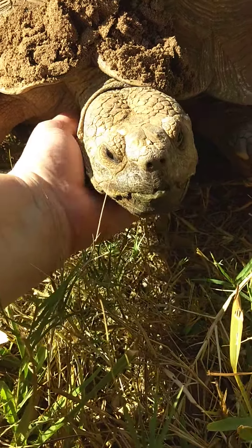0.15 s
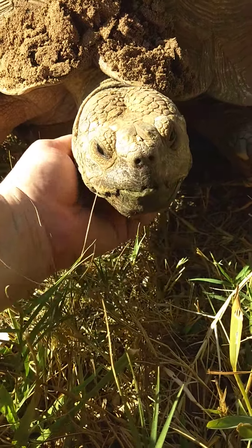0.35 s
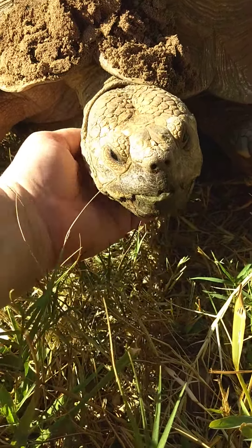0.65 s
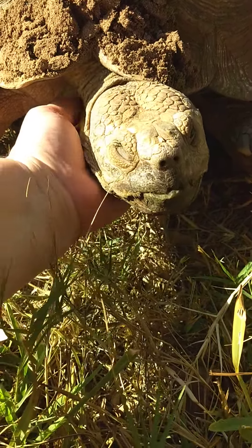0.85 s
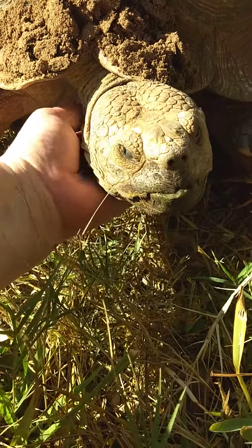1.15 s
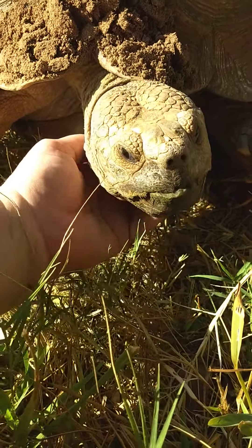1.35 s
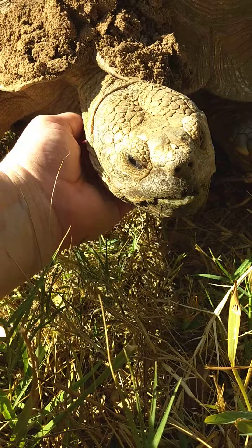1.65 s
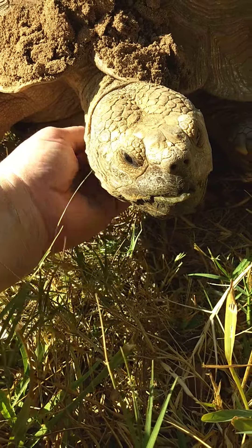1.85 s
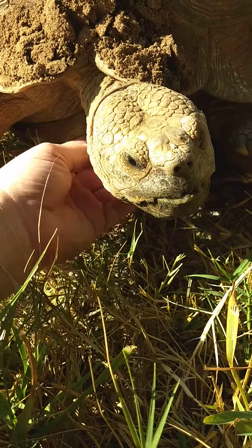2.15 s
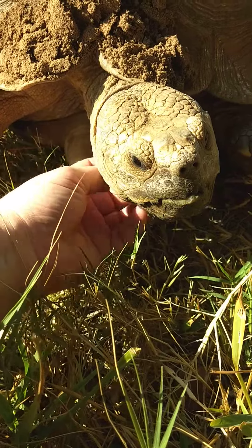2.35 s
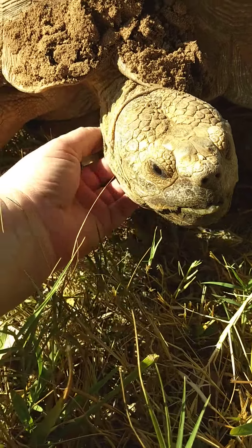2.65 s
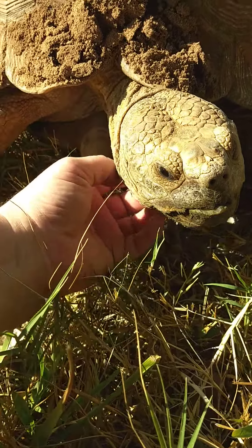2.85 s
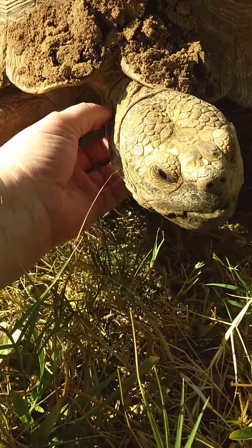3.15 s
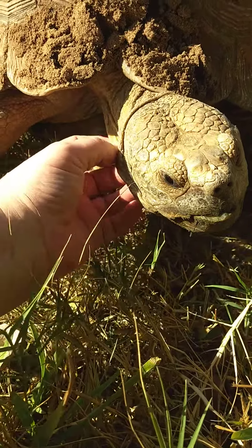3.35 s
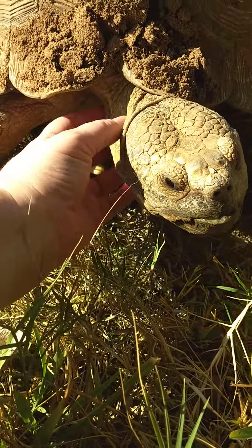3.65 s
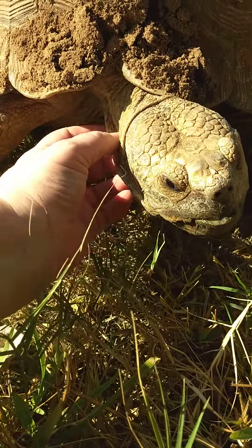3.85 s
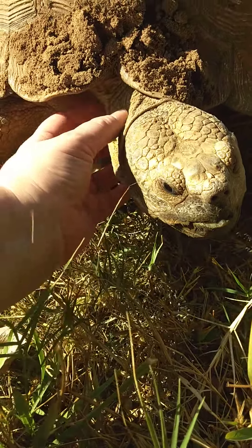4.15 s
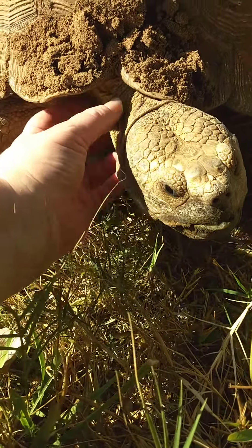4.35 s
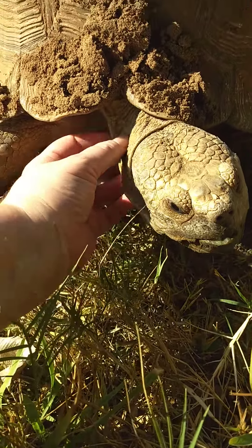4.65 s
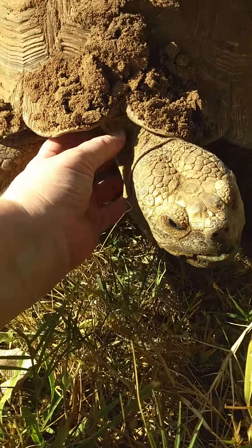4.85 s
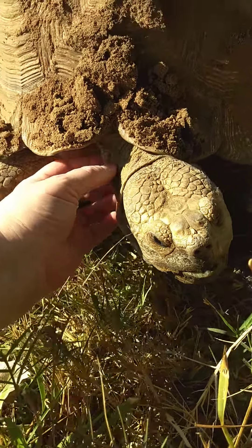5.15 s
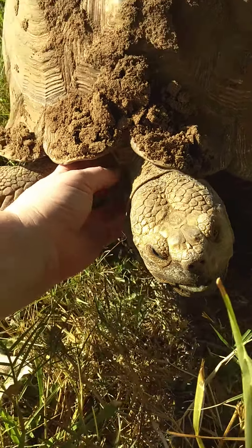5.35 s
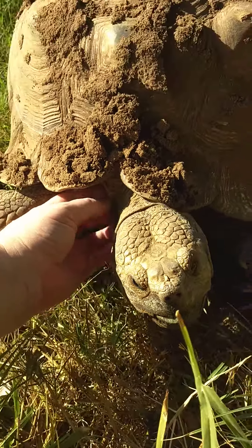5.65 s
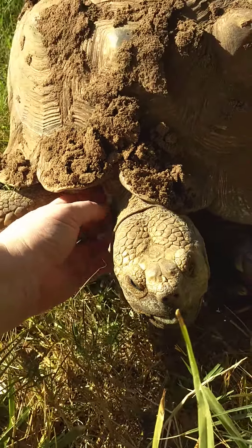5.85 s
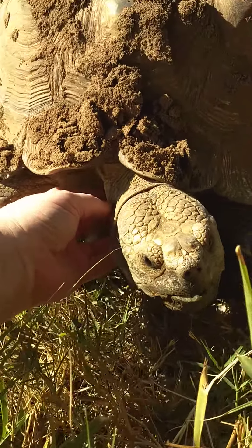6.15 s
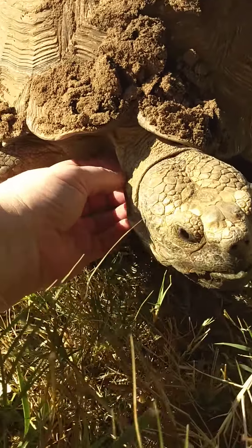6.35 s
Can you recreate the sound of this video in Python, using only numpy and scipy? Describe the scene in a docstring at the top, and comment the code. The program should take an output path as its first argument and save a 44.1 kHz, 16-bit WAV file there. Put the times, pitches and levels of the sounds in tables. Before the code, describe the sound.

Quiet outdoor air with a low distant murmur and steady hiss. A hand strokes a large tortoise's neck, at first barely audible. A bird warbles a quick repeated whistle, then another chatters in dry chips. A short nasal call follows as the rubbing becomes firmer, with crisp grass and grit ticks near the end. The microphone is close to the hand, with the birds farther off in stereo.

```python
"""A hand strokes the neck of a big tortoise on a quiet, sunny lawn, over far murmur and even hiss.
One faint far call opens the scene, then soft strokes begin: skin slipping on dry scales, as filtered
noise grains. A warbler repeats its figure of gliding notes, then a small bird chatters in bursts of
falling chips. A nasal call of harmonics starts as the rubbing firms up, and more far birds call after
it; the loudest flicks of grass and grit come near the end. Two ports subtract to widen the stereo."""
import sys
import numpy as np
from scipy import signal
from scipy.fft import rfft, irfft, next_fast_len
from scipy.io import wavfile

SR = 44100
rng = np.random.default_rng(int(sys.argv[2]) if len(sys.argv) > 2 else 0)


def to_wav(s):
    """Save 16-bit WAV."""
    ch = np.atleast_2d(s).T  # columns
    pcm = np.round(np.clip(ch, -1, 1) * 32767)  # PCM
    wavfile.write(sys.argv[1], SR, pcm.astype(np.int16))


N = 286778
CUTOFF_HZ = 15850
PADDED = next_fast_len(N, True)
TIME = np.arange(N) / SR
FREQ = np.maximum(np.fft.rfftfreq(PADDED, 1 / SR), 1)


def from_db(db):
    """Logarithmic level: 20 dB is a factor of ten in amplitude."""
    return 10 ** (np.asarray(db) / 20)


def rms_one(x):
    """Normalisation: scale to unit mean power."""
    return x / np.sqrt(np.mean(x ** 2) + 1e-20)


def over_freq(points):
    """Interpolation: join (Hz, value) points along a log-frequency axis."""
    hz, value = np.transpose(points)
    return np.interp(np.log(FREQ), np.log(hz), value)


def above(edge_hz, order=4):
    """Butterworth response: amplitude gain of a smooth high-pass."""
    return 1 / np.sqrt(1 + (edge_hz / FREQ) ** (2 * order))


def colour(x, gain):
    """Linear filtering: multiply the spectrum by a gain for each frequency."""
    return irfft(rfft(x, PADDED) * gain, PADDED)[..., :N]


def drift(rate_hz):
    """Random modulation: low-passed noise with spread 1."""
    return rms_one(colour(rng.standard_normal(N), 1 / (1 + (FREQ / rate_hz) ** 2)))


def add(track, s, sound):
    """Superposition: mix a sound into the track from a given second."""
    at = max(int(s * SR), 0)
    track[at:at + len(sound)] += sound[:max(N - at, 0)]


def garden(x, t60, wet_db):
    """Diffuse reflection: one port hears x directly, both hear decaying scatter from plants and walls."""
    t = np.arange(int(t60 * SR)) / SR
    scatter = rng.standard_normal((2, len(t))) * from_db(-60 * t / t60)
    scatter /= np.sqrt(np.sum(scatter ** 2, axis=1, keepdims=True))
    wet = signal.fftconvolve(x[None], scatter, axes=1)[:, :N]
    direct = x * np.array([[0], [1]])
    return direct + from_db(wet_db) * wet


def widen(ports, far_db, cross_db):
    """Delay-and-subtract array: each channel subtracts the other port, late by the travel time."""
    travel_s = 20 / SR
    ports = ports * from_db([[far_db], [0]])
    crossed = colour(ports[::-1], from_db(cross_db) * np.exp(-2j * np.pi * FREQ * travel_s))
    return ports - crossed


# Spectrum of the far murmur before its band limits.
# Each row: frequency in Hz, density in dB per Hz.
MURMUR_SPECTRUM = [(30, -49), (42, -14), (55, -3.5), (90, -4.5), (125, -0.5), (180, -0.44), (300, -3.5),
                   (500, -3.5), (750, -10.5), (1100, -14), (1500, -19)]
# Slow swelling of the murmur, before the common offsets of its two parts.
# Each row: time in seconds, level of the rumble in dB, level of the rush in dB.
MURMUR_SWELL = [(0.0, -51.5, -60), (2.15, -52, -58), (2.3, -54, -62), (2.37, -51.5, -57.5),
                (3.64, -52.5, -59.5), (3.82, -49, -56), (5.5, -51.5, -55.5), (6.48, -50, -56.5),
                (6.5, -52, -56)]
# How alike the murmur is in the two channels.
# Each row: frequency in Hz, left-right correlation from -1 to 1.
MURMUR_CORRELATION = [(40, -0.23), (70, -0.3), (125, 0.38), (250, 0.61), (600, 0.54), (1100, 1),
                      (1550, 0.47)]


def murmur(rumble_db, rush_db, top_hz):
    """Partially coherent field: far traffic and air, a low rumble and a lighter rush that swell apart."""
    mid_noise, side_noise = rng.standard_normal((2, N))
    alike = np.clip(over_freq(MURMUR_CORRELATION), -1, 1)
    low_pass = np.sqrt(1 - above(top_hz, order=6) ** 2)
    gain = from_db(over_freq(MURMUR_SPECTRUM)) * above(40, order=4) * low_pass
    # the shares of sum and difference set the correlation
    mid = colour(mid_noise, gain * np.sqrt(1 + alike))
    side = colour(side_noise, gain * np.sqrt(1 - alike))
    air = np.array([mid + side, mid - side]) * from_db([[-.9], [.9]])
    rush = colour(air, above(626, order=4) ** 2)
    rumble = air - rush
    s, low_db, high_db = np.transpose(MURMUR_SWELL)
    rumble_gain = from_db(np.interp(TIME, s, low_db) + rumble_db)
    rush_gain = from_db(np.interp(TIME, s, high_db) + rush_db)
    return rms_one(rumble) * rumble_gain + rms_one(rush) * rush_gain


# Spectrum of the hiss before its band limits.
# Each row: frequency in Hz, density in dB per Hz.
HISS_SPECTRUM = [(1600, -3), (2500, 2), (4000, -4.5), (6000, -7.5), (8300, -13.5), (11000, -8.5),
                 (15000, -6.5)]


def hiss(level_db, low_hz):
    """Stationary noise: even hiss, independent at the two ports."""
    gain = from_db(over_freq(HISS_SPECTRUM)) * above(low_hz, order=6) * (FREQ < CUTOFF_HZ)
    return from_db(level_db) * rms_one(colour(rng.standard_normal((2, N)), gain))


def glide(length, pitches, waver=0):
    """Frequency modulation: a pure note bends through three pitches and fades at both ends."""
    u = np.linspace(0, 1, int(length * SR))
    bend = np.polyfit([0, .5, 1], pitches, 2)
    hz = np.polyval(bend, u) * (1 + np.resize(waver, len(u)))
    envelope = np.sqrt(2 * np.abs(np.sin(np.pi * u)))
    return envelope * np.sin(2 * np.pi * np.cumsum(hz) / SR)


def whistles(notes, waver_share, waver_rate):
    """Random frequency modulation: gliding notes, the hoarse ones shaking quickly in pitch."""
    out, shake = np.zeros(N), drift(waver_rate)
    for s, length, first, middle, last, db, hoarse in notes:
        waver = waver_share * hoarse * shake[max(int(s * SR), 0):]
        add(out, s, from_db(db) * glide(length, [first, middle, last], waver))
    return out


# Far bird calls, later blurred by distance; levels are before the garden and its final gain.
# Each row: start in seconds, length in seconds, first pitch in Hz, last pitch in Hz, level in dB,
# hoarseness from 0 to 1.
DISTANT_CALLS = [(0, 0.23, 2885, 2740, -69.5, .4), (4.403, 0.51, 2625, 2960, -66.5, 0.84),
                 (4.951, 0.8, 3400, 3738, -60, 0.9), (5.44, 0.083, 2745, 2163, -47.5, 0.9),
                 (5.48, .3, 1780, 1690, -63.5, 0.74), (5.751, 0.26, 2625, 3026, -64.5, .7),
                 (6.256, .2, 2885, 3040, -63, 0.47)]


def far_notes():
    """Linear glide: far calls slide evenly from their first pitch to their last."""
    return [(s, length, first, (first + last) / 2, last, db, hoarse)
            for s, length, first, last, db, hoarse in DISTANT_CALLS]


NASAL_START_S, NASAL_LENGTH_S, NASAL_ATTACK_S, NASAL_RELEASE_S = 3.975, .42, 0.041, 0.073
NASAL_HZ, NASAL_SAG_HZ, NASAL_SAG_POWER = 739, 84.6, 1.4  # sags ever faster
THROAT_START_HZ, THROAT_END_HZ, THROAT_SETTLE_S = 3460, 2770, 0.15


def nasal_call(level_db, throat_width_hz, overtone_db, jitter):
    """Source and filter: a settling throat resonance picks one or two harmonics of a sagging pitch."""
    age = np.clip(TIME - NASAL_START_S, 0, NASAL_LENGTH_S)
    hz = NASAL_HZ - NASAL_SAG_HZ * (age / NASAL_LENGTH_S) ** NASAL_SAG_POWER
    throat_hz = THROAT_END_HZ + (THROAT_START_HZ - THROAT_END_HZ) * np.exp(-age / THROAT_SETTLE_S)
    fades = np.minimum(age / NASAL_ATTACK_S, (NASAL_LENGTH_S - age) / NASAL_RELEASE_S)
    envelope = np.minimum(1, fades)
    phase = 2 * np.pi * np.cumsum(hz * (1 + jitter * drift(78))) / SR
    harmonic = np.arange(4, 10)[:, None]
    resonance = 1 / (1 + ((harmonic * hz - throat_hz) / throat_width_hz) ** 2)
    strength = resonance + from_db(overtone_db)
    return envelope * from_db(level_db) * np.sum(strength * np.sin(harmonic * phase), axis=0)


# The warbler's figures, each sung low-high-high-low; the last column bends the third note.
# Each row: start in seconds, low pitch in Hz, high pitch in Hz, low level in dB, high level in dB
# (both added to the note's own level), upward flick in Hz.
WARBLER_FIGURES = [(1.4, 1856, 2220, 1, -3, 5), (1.642, 1790, 2244, -1.5, -0.5, 167),
                   (1.879, 1750, 2230, -1.5, -0.5, -3)]
# The four notes of a figure.
# Each row: delay in seconds, length in seconds, first, middle and last pitch as ratios, level in dB.
FIGURE_NOTES = [(.002, 0.05, .985, 1.003, 1.02, -53), (.044, 0.028, 1.03, .975, 0.97, -44.5),
                (.068, 0.046, .98, 1.008, 0.99, -37.5), (.114, 0.0522, 1.025, .99, 0.86, -50)]
WARBLE_HOARSENESS = 0.13


def warbler_notes():
    """Scaling of a motif: the four-note figure repeats, each time with its own pitches and levels."""
    notes = []
    for s, low_hz, high_hz, low_db, high_db, flick_hz in WARBLER_FIGURES:
        low, high = (low_hz, low_db, 0), (high_hz, high_db, 0)
        flicked = (high_hz, high_db, flick_hz)
        for (hz, db, lift_hz), note in zip([low, high, flicked, low], FIGURE_NOTES):
            delay, length, first, middle, last, note_db = note
            pitches = first * hz, middle * hz + lift_hz / 3, last * hz + lift_hz
            notes.append((s + delay, length, *pitches, db + note_db, WARBLE_HOARSENESS))
    return notes


# Thin lisps that open bursts of chatter, each with a faint chip under it.
# Each row: start in seconds, pitch in Hz, level in dB before the garden.
LISP_NOTES = [(2.702, 5070, -62), (3.448, 5230, -56), (5.24, 4980, -52.5)]
LISP_LENGTH_S, LISP_HOARSENESS = 0.049, 0.28


def lisp_notes():
    """Narrow-band tone: each lisp holds one pitch, shaken by hoarseness."""
    return [(s, LISP_LENGTH_S, hz, hz, hz, db, LISP_HOARSENESS) for s, hz, db in LISP_NOTES]


# Bursts of a small bird's chatter.
# Each row: start in seconds, length in seconds, top pitch of the first chip in Hz, chip level in dB
# before filtering and echoes.
CHATTER_BURSTS = [(2.755, .45, 4030, -38), (3.505, .35, 4230, -37), (3.946, .05, 3420, -36),
                  (5.297, .05, 4080, -41)]
CHIP_PERIOD_S, CHIP_REST_HZ, CHIP_SETTLE_S = .0983, 3220, 0.117
LISP_CHIP_HZ, LISP_CHIP_DB = 4150, -50


def chips():
    """Exponential relaxation: chips repeat evenly and settle in pitch; lisps add faint ones."""
    run = []
    for s, length, top_hz, db in CHATTER_BURSTS:
        for age in np.arange(0, length, CHIP_PERIOD_S):
            hz = CHIP_REST_HZ + (top_hz - CHIP_REST_HZ) * np.exp(-age / CHIP_SETTLE_S)
            run.append((s + age, hz, db))
    return run + [(s, LISP_CHIP_HZ, LISP_CHIP_DB) for s, _, _ in LISP_NOTES]


# Nearby surfaces that throw the chatter back.
# Each row: delay in seconds, level in dB relative to the direct sound.
NEAR_ECHOES = [(.0032, -4.5), (0.0096, -11), (0.023, -17)]


def chatter(sweep_s, twin_s, lead_s, fall, twin_fall, lead_db, first_db):
    """Chirps and comb filtering: a faint rising flick and two fast falling sweeps, with close echoes."""
    out = np.zeros(N)
    for s, top_hz, db in chips():
        sweep = from_db(db) * glide(sweep_s, np.linspace(top_hz, top_hz * fall, 3))
        twin = from_db(db) * glide(sweep_s, np.linspace(top_hz, top_hz * twin_fall, 3))
        add(out, s - lead_s, from_db(lead_db) * sweep[::-1])  # reversed, so it rises
        add(out, s - sweep_s / 2, from_db(first_db) * sweep)
        add(out, s + twin_s - sweep_s / 2, twin)
    bounce = 1 + sum(from_db(db) * np.exp(-2j * np.pi * FREQ * delay) for delay, db in NEAR_ECHOES)
    return colour(out, bounce)


def stray_flicks(count, level_db):
    """Random point process: faint flicks at chance moments, as (second, dB)."""
    return [(when * N / SR, level_db) for when in rng.random(count)]


# How a stroke's character follows its level: up to -50 dB it is interpolated between the first two
# rows, above that it takes the third.
# Each row: level in dB, share of its length spent letting go, graininess in dB,
# brightness in dB per octave.
STROKE_FIRMNESS = [(-72, .45, 0, -4), (-48, 0.4, -0.5, 0.1), (-50, 0.28, 1.5, 1.5)]
# Strokes of the hand; levels are before graininess, brightness and stereo widening.
# Each row: strongest moment in seconds, length in seconds, level in dB.
HAND_STROKES = [(.51, 0.2, -68.5), (0.874, .38, -63.5), (1.405, 0.35, -61.5), (1.712, 0.34, -66),
                (2.003, 0.22, -62.5), (2.41, 0.16, -55), (2.586, .21, -62), (2.835, 0.17, -62),
                (3.05, 0.16, -61.5), (3.308, 0.15, -58), (3.495, 0.2, -56.5), (3.785, 0.2, -51.5),
                (3.955, 0.08, -48.5), (4.139, 0.05, -53.5), (4.28, 0.14, -44.5), (4.403, 0.075, -49),
                (4.644, 0.11, -53.5), (4.72, 0.092, -41.5), (4.867, 0.056, -47), (5.096, 0.21, -51),
                (5.525, 0.29, -54.5), (5.905, .05, -45.5), (5.964, 0.026, -36), (5.996, 0.04, -46),
                (6.129, 0.042, -53.5), (6.304, 0.1, -51.5), (6.485, 0.04, -53)]


def stroke_touches(swell_db, slip_rate):
    """Stick-slip friction: skin catches in tiny slips while pressure swells and lets go."""
    slips, touches = np.clip(drift(slip_rate), -2, 2), []
    firm_db, *traits = np.transpose(STROKE_FIRMNESS)
    for top, length, db in HAND_STROKES:
        letting_go, grainy_db, bright_db = [np.interp(db, firm_db, trait) for trait in traits]
        start, end = top - (1 - letting_go) * length, top + letting_go * length
        span = (TIME > start) & (TIME < end)
        pressure = np.interp(TIME[span], [start, top, end], [0, 1, 0])
        raggedness_db = grainy_db * (slips[span] - grainy_db / 10)
        level = db - swell_db * (1 - pressure) + raggedness_db
        touches.append((start, pressure * from_db(level) ** 2, bright_db))
    return touches


# Dry grass and grit flicked by the fingers; levels are before brightness and stereo widening.
# Each row: peak time in seconds, level in dB.
GRASS_FLICKS = [(1.065, -54), (2.201, -58), (3.349, -55), (4.58, -48.5), (4.749, -49), (4.888, -47),
                (4.997, -41.5), (5.045, -53), (5.066, -47), (5.168, -53), (5.572, -47), (5.617, -53),
                (5.929, -38), (6.347, -42.5), (6.387, -38.5)]
FLICK_NEUTRAL_DB, FLICK_TILT_PER_DB = -46, 0.3042  # tilt in dB per octave for each dB


def flick_touches(rise_s, decay_s):
    """Impulsive excitation: power rises and dies exponentially, and a harder flick is brighter."""
    age = TIME[:SR // 10] - TIME[SR // 50]
    burst = np.exp(np.minimum(age / rise_s, -age / decay_s))
    touches = []
    for s, db in GRASS_FLICKS + stray_flicks(count=10, level_db=-61):
        bright_db = FLICK_TILT_PER_DB * (db - FLICK_NEUTRAL_DB)
        touches.append((s + age[0], burst * from_db(db) ** 2, bright_db))
    return touches


# Spectrum of skin on scales and grass, before its band limits and each touch's brightness.
# Each row: frequency in Hz, density in dB per Hz.
RUB_SPECTRUM = [(1500, 1), (2600, -8), (5000, -6.5), (8500, -10), (11000, -6.5), (13000, -2), (15000, 0.5)]


def hand(touches, grain_rate, grain_spread_db, patchy_db, pivot_hz):
    """Granular friction noise: random grains take the power of the touches, band by band."""
    born = rng.random(N) < grain_rate / SR
    sizes = from_db(grain_spread_db * rng.standard_normal(N))
    grains = rfft(rms_one(born * sizes * rng.standard_normal((2, N))), PADDED)
    body = rms_one(from_db(over_freq(RUB_SPECTRUM)) * above(2560, order=2) * (FREQ < CUTOFF_HZ))
    out, edges = 0, np.linspace(1000, CUTOFF_HZ, 10)
    for low, high in zip(edges, edges[1:]):
        # every scale rasps a little differently, so each band flickers on its own
        power, octaves = np.zeros(N), np.log2((low + high) / 2 / pivot_hz)
        for s, touch, bright_db in touches:
            add(power, s, touch * from_db(bright_db * octaves) ** 2)
        in_band = (FREQ >= low) & (FREQ < high)
        band = irfft(grains * body * in_band, PADDED)[:, :N]
        out = out + band * np.sqrt(power) * from_db(patchy_db * drift(35))
    return out


def scene():
    """Superposition of sources: murmur and hiss behind, birds around, the hand close by."""
    far_murmur = murmur(rumble_db=1.0, rush_db=-0.5, top_hz=1403)
    port_hiss = widen(hiss(level_db=-64.5, low_hz=1440), far_db=1.0, cross_db=-1.05)

    far = whistles(far_notes(), waver_share=0.0898, waver_rate=209) * from_db(2.8 * drift(6.3))
    birds = garden(far, t60=.45, wet_db=2.5) * from_db(-4)
    call = nasal_call(level_db=-47.5, throat_width_hz=230, overtone_db=-23, jitter=.009)
    birds += garden(call * from_db(2.2 * drift(30)), t60=.35, wet_db=-6.5)
    near = whistles(warbler_notes() + lisp_notes(), waver_share=0.09, waver_rate=280)
    birds += garden(near, t60=0.2, wet_db=-10.5)
    chipping = chatter(sweep_s=.0064, twin_s=.0115, lead_s=.01,
                       fall=0.625, twin_fall=0.565, lead_db=-12, first_db=-3.0)
    birds += garden(colour(chipping, above(1800, order=8)), t60=.22, wet_db=-9.5)
    birds = widen(birds, far_db=-1.2, cross_db=-3.5)

    touches = stroke_touches(swell_db=5.0, slip_rate=280) + flick_touches(rise_s=.0016, decay_s=.003)
    rubbing = hand(touches, grain_rate=5000, grain_spread_db=2.5, patchy_db=2.26, pivot_hz=13500)
    rubbing = widen(rubbing, far_db=-3.5, cross_db=-1.5) * from_db([[-.5], [.5]])
    return far_murmur + port_hiss + birds + rubbing


def record(dry):
    """Elliptic low-pass: the top is cut steeply."""
    return signal.sosfilt(signal.ellip(12, .1, 70, CUTOFF_HZ, fs=SR, output="sos"), dry)


dry = scene()
out = record(dry)
to_wav(out)
```